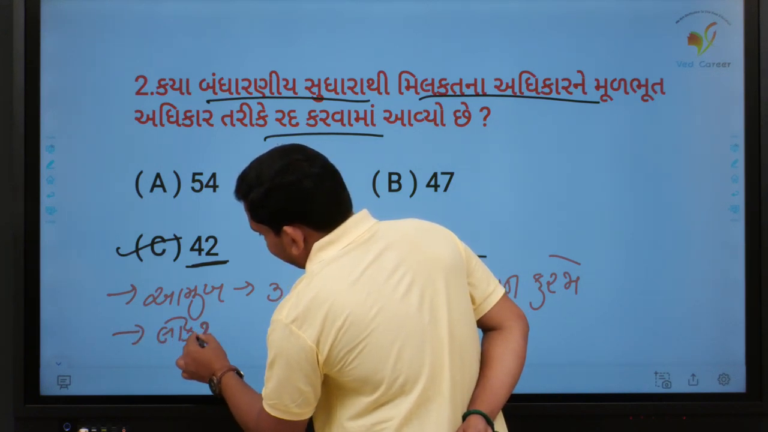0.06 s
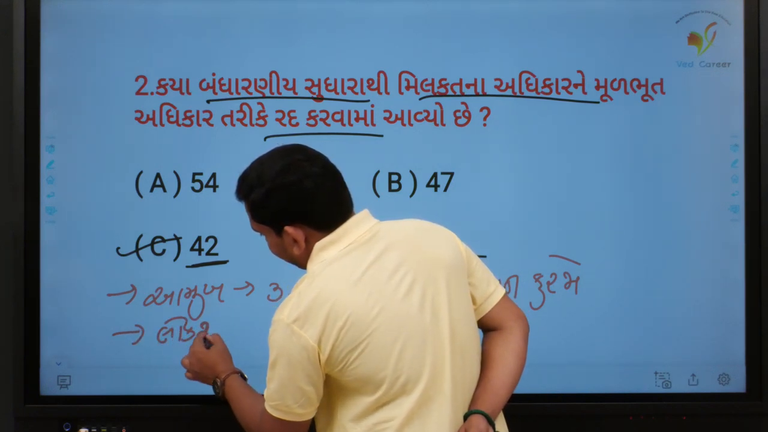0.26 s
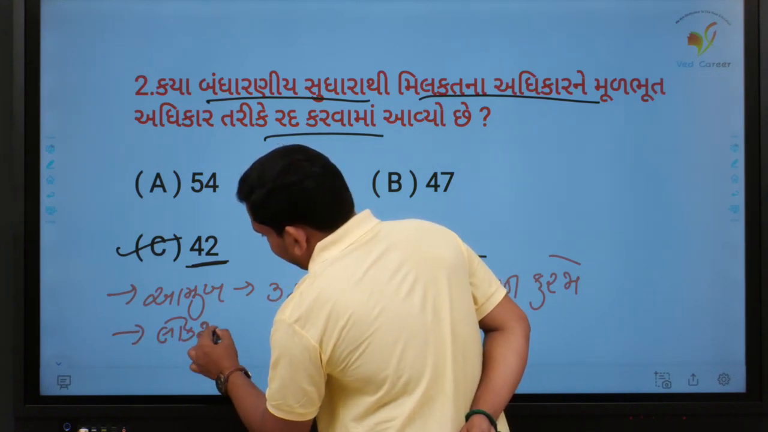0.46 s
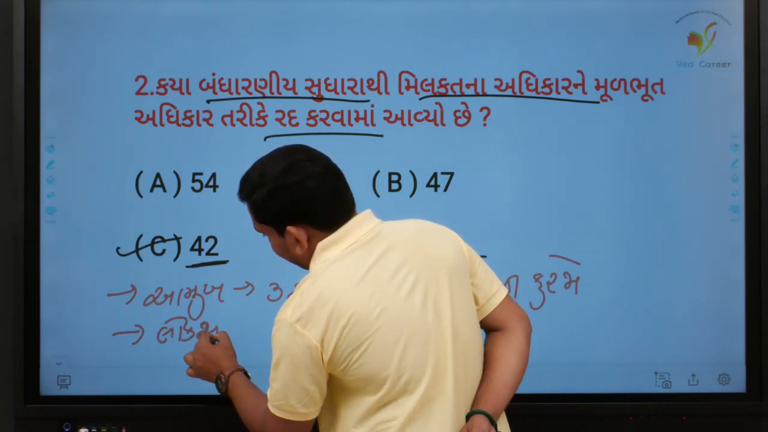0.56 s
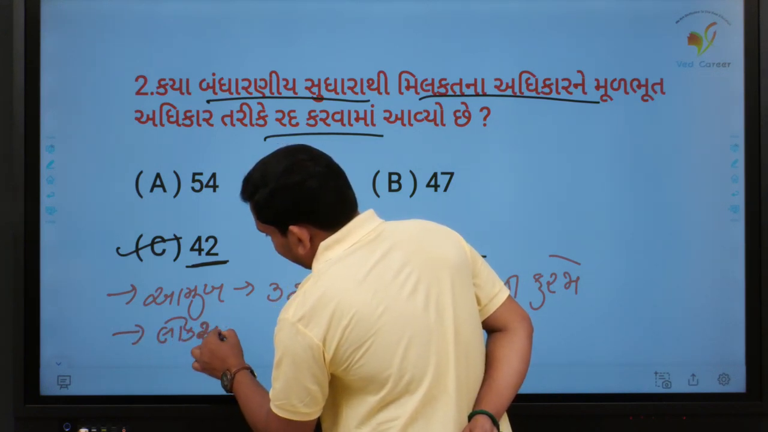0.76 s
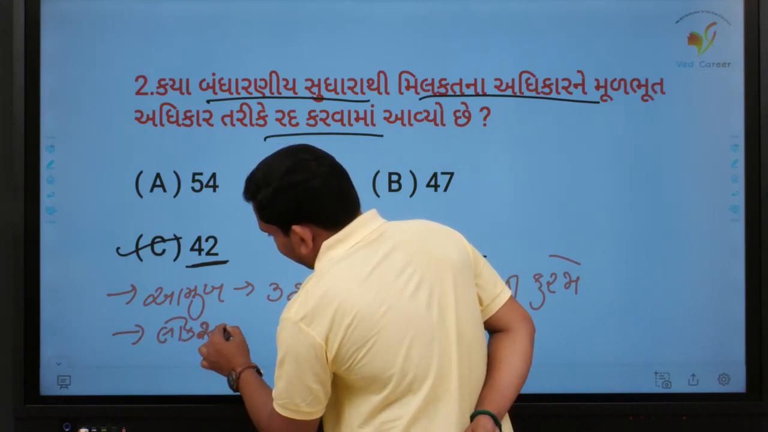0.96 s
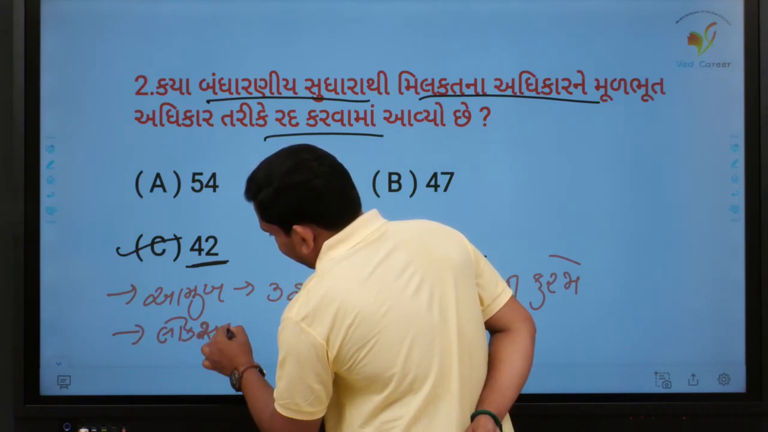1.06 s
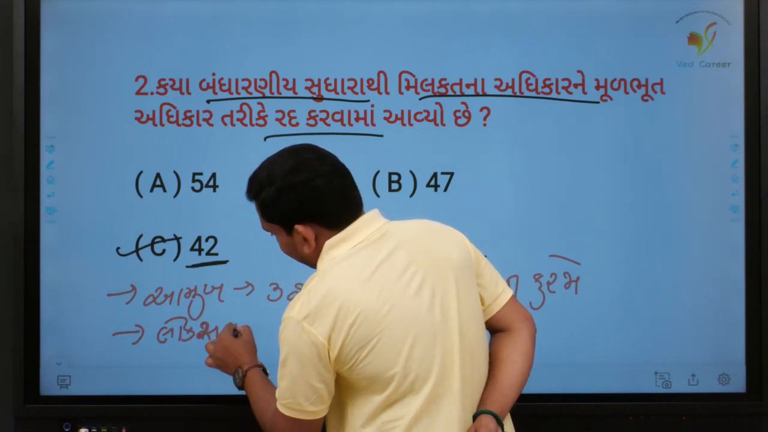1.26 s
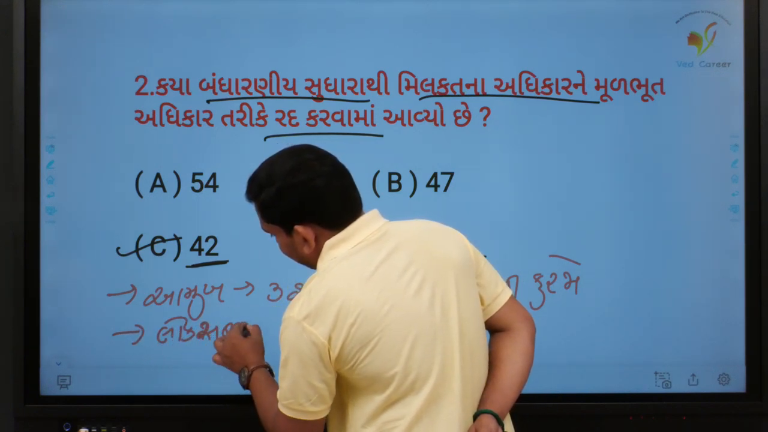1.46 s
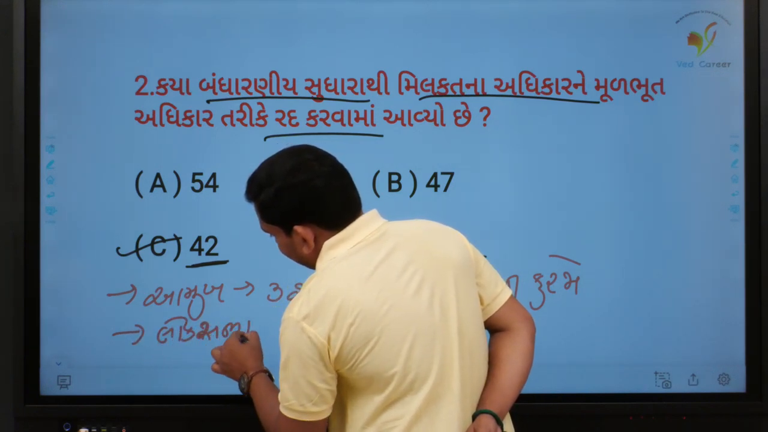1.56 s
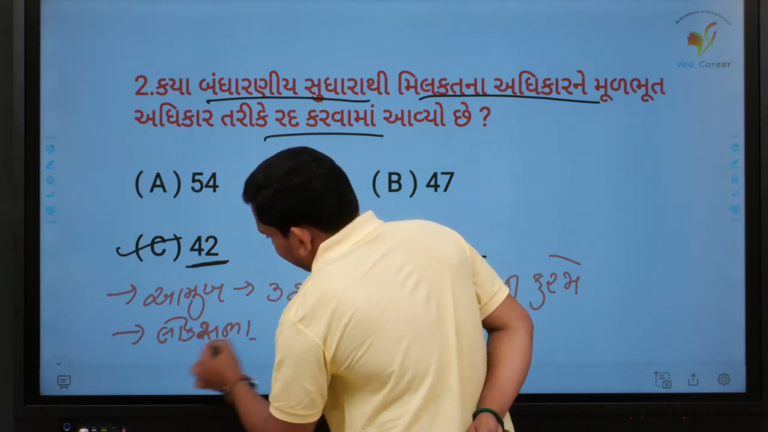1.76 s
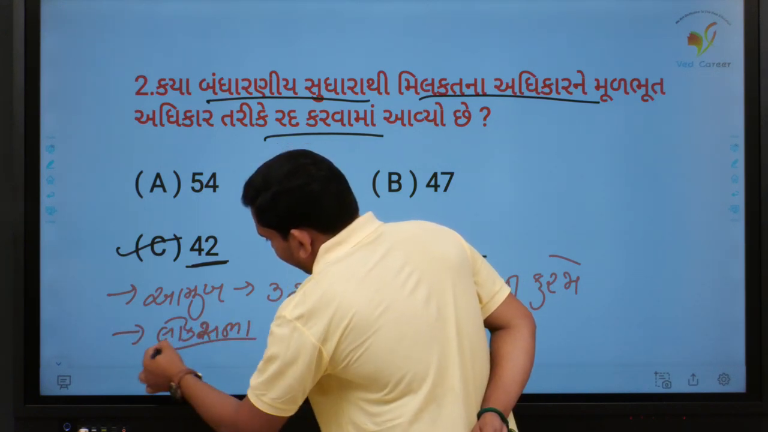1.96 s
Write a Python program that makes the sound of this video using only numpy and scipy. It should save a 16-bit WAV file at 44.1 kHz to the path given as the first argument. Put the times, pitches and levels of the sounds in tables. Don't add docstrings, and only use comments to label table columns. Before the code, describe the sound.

Stylus taps and light friction scratches on a glass panel, starting quietly, then medium, soft and firm knocks, the hardest rattling near the end, with slight room echo and swelling low ventilation hum.

```python
import sys
import numpy as np
from scipy import signal
from scipy.fft import rfft, irfft
from scipy.io import wavfile
from scipy.ndimage import uniform_filter1d, map_coordinates

SR = 44100
rng = np.random.default_rng(int(sys.argv[2]) if len(sys.argv) > 2 else 0)


def nominal_scale(level):
    x = np.asarray(level, float) / 20
    return 10 ** x


def inscribe(sig):
    pcm = np.round(np.clip(np.atleast_2d(sig).T, -1, 1) * 32767)
    wavfile.write(sys.argv[1], SR, pcm.astype(np.int16))


N = 88861

# mode_hz, level_db, t60_s
PANEL_MODES = [(122, -27.5, 0.72), (251.1, -26.5, 0.2), (480, -14, 0.12), (637, -73, 0.12),
               (810, -19, 0.043), (900, -7, 0.036), (891, -9, 0.088), (1152, -8, 0.02), (1393, -12.5, 0.09),
               (1562, -5.5, 0.12), (1862, -18.5, 0.021), (2250, 2.5, 0.0028)]
# freq_hz, level_db
PEN_RATTLE = [(900, 11), (1900, 8.5), (2900, 0), (4300, 3), (5400, -4), (6800, -18), (8800, -14),
              (16000, -28)]


def evened(x):
    return x / np.sqrt(np.mean(x ** 2) + 1e-20)


def read(points, hz):
    f, value = np.transpose(points)
    return np.interp(np.log(hz + 1), np.log(f + 1), value)


def colour(x, points):
    gain = nominal_scale(read(points, np.fft.rfftfreq(len(x), 1 / SR)))
    return irfft(rfft(x) * gain, len(x))


def lowpass(x, order, hz):
    return signal.sosfilt(signal.butter(order, hz, fs=SR, output="sos"), x)


def highpass(x, order, hz):
    return signal.sosfilt(signal.butter(order, hz, "high", fs=SR, output="sos"), x)


def add(mix, start_s, sound):
    at = round(start_s * SR)
    sound = sound[max(-at, 0):]
    part = mix[max(at, 0):][:len(sound)]
    part += sound[:len(part)]


def resonate(x, hz, width_hz):
    radius = np.exp(-np.pi * width_hz / SR)
    turn = np.exp(2j * np.pi * hz / SR)
    return 2 * signal.lfilter([1 - radius], [1, -radius * turn], x + 0j).real


def taps():
    # start_s, peak_db, contact_ms, knock_hz, rattle_db, tick_db
    landings = [
        (-.12, -15, 0.63, 672, -7.5, -18),
        (.3778, -16, 0.54, 682, -16, -37.5),
        (0.5043, -20, 0.56, 676, -21, -54),
        (.7570, -12.5, 0.47, 656, -13, -37),
        (0.9904, -20, 0.55, 671, -24, -67),
        (1.5033, -10, 0.52, 639, -5, -29),
        (1.7332, -11, 0.59, 655, -14.5, -57),
    ]
    # (overtone_hz, level_re_peak_db) x 3
    spot_overtones = [(870, -39, 1300, -26, 1200, -34), (940, -32, 1180, -24, 1700, -20),
                      (910, -25, 1070, -32, 950, -23), (905, -25.5, 1090, -23, 1778, -17),
                      (892, -18.5, 1100, -32, 1500, -20), (905, -26, 990, -19, 1900, -18.5),
                      (848, -18, 1250, -21.5, 2800, -41)]
    # start_s, knock_db, tick_db
    touches = [
        (.27, -66, -66),
        (.887, -66, -59),
        (1.232, -52, -80),
        (1.307, -46, -78),
        (1.612, -66, -68),
        (1.7297, -60, -62),
    ]
    touch_decay_s, touch_rise_s, touch_hz = 0.003, 0.00078, 647
    out, t = np.zeros(N), np.arange(SR) / SR
    for row, overtones in zip(landings, spot_overtones):
        add(out, row[0], tap(*row[1:], overtones, rng.standard_normal(SR)))
    for start_s, knock_db, tick_db in touches:
        tick = evened(colour(rng.standard_normal(SR), PEN_RATTLE)) * np.exp(-t / touch_decay_s)
        note = knock(t, touch_hz) * np.minimum(t / touch_rise_s, 1)
        add(out, start_s, nominal_scale(knock_db) * note + nominal_scale(tick_db) * tick)
    return out


def tap(peak_db, contact_ms, knock_hz, rattle_db, tick_db, overtones, noise):
    panel_db, blow_db, radiate_hz, knock_db = -7, 2.5, 430, -8.5
    overtone_t60_s, rattle_t60_s, tick_decay_s, tick_top_hz = 0.036, 0.045, 0.0008, 15000
    room_db, room_top_hz = -5, 2600
    overtone_room_db, rattle_room_db, knock_room_db = -7, -9, -10.5
    t = np.arange(len(noise)) / SR
    contact = np.clip(t * 1000 / contact_ms, 0, 1)
    blow = np.sin(np.pi * contact) ** 2.15
    push = highpass(blow, 2, radiate_hz)

    spot = rng.uniform(-1.2, 1, (len(PANEL_MODES), 2))
    glass = nominal_scale(panel_db) * signal.fftconvolve(ring(t, spot), blow[:200] / blow.sum())[:len(t)]
    body = -nominal_scale(peak_db) * (glass + nominal_scale(blow_db) * push)

    over = np.zeros(len(t))
    for hz, over_db in np.reshape(overtones, (-1, 2)):
        over -= nominal_scale(peak_db + over_db - 60 * t / overtone_t60_s) * np.sin(2 * np.pi * hz * t)
    note = nominal_scale(peak_db + knock_db) * knock(np.maximum(t - contact_ms / 1000, 0), knock_hz)

    pen = evened(colour(noise, PEN_RATTLE)) * nominal_scale(rattle_db - 15.5 - 60 * t / rattle_t60_s) * contact
    tick = lowpass(nominal_scale(tick_db) * noise * np.exp(-t / tick_decay_s), 4, tick_top_hz)

    to_room = lowpass(body, 2, room_top_hz) + nominal_scale(overtone_room_db) * over
    to_room = to_room + nominal_scale(rattle_room_db) * (pen + tick) + nominal_scale(knock_room_db) * note
    return body + over + pen + tick + note + nominal_scale(room_db) * edged(room(to_room))


def ring(t, spot):
    bass_db, longest_t60_s = 5.5, 0.032
    spread_db, spread_share = 2.5, 0.025
    out = np.zeros(len(t))
    for (hz, db, t60_s), (louder, sharper) in zip(PANEL_MODES, spot):
        if hz < 300:
            gain_db = bass_db
        else:
            gain_db = spread_db * louder
            t60_s = min(t60_s, longest_t60_s)
        sine = np.sin(2 * np.pi * hz * (1 + spread_share * sharper) * t)
        out += nominal_scale(db + gain_db - 60 * t / t60_s) * sine
    return out


def knock(t, hz):
    hold_s, t60_s = 0.0076, 0.0092
    return np.sin(2 * np.pi * hz * t) * nominal_scale(-60 * np.maximum(t - hold_s, 0) / t60_s)


def strokes():
    # start_s, length_s, level_db, reflection_ms, reflection_share, treble_db
    rubs = [(-.01, 0.14, -64.5, 0.55, 0.12, 12), (.125, 0.14, -69.5, 0.98, .2, 21),
            (0.39, 0.056, -63.5, .5, .15, 13), (0.521, 0.083, -62, 0.54, 0.14, 0),
            (0.782, .09, -60.5, 0.45, 0.19, 6), (1.019, 0.085, -65.5, .53, 0.34, 15),
            (1.108, 0.064, -61.5, .53, 0.21, 4), (1.191, .1, -61, 0.54, 0.36, 8),
            (1.3, 0.08, -60.5, 0.59, 0.27, 3), (1.504, 0.073, -53, 0.57, 0.17, -4),
            (1.756, 0.21, -51.5, 0.59, 0.49, 6)]
    # freq_hz, level_db
    tip_colour = [(1500, 15), (3000, 0.5), (4300, 9), (5800, 3), (7500, -5), (8700, 3.5), (11500, 2),
                  (15000, -2)]
    # centre_s, length_s, level_db, pitch_hz, width_hz
    chatter = [(0.085, 0.047, -53.5, 1150, 430), (.07, 0.091, -78.5, 4600, 580),
               (.2, 0.13, -74.5, 4700, 680), (0.18, 0.11, -75.5, 6200, 610), (.22, 0.063, -61.5, 1020, 610),
               (0.562, 0.053, -75, 11000, 1100), (0.818, 0.052, -73, 11000, 960),
               (1.08, .06, -74, 14800, 1200), (1.065, 0.053, -71, 13000, 800),
               (1.28, .07, -69, 14900, 1200), (1.284, 0.072, -70, 12700, 610),
               (1.244, 0.066, -69.5, 4110, 750), (1, 0.048, -67, 10600, 700),
               (1.325, 0.053, -67.5, 3340, 3700), (1.35, 0.073, -58, 1030, 490),
               (1.55, .05, -66, 14700, 900), (1.805, 0.073, -54, 14500, 1800),
               (1.805, 0.037, -61, 8550, 600), (1.89, 0.065, -57.5, 8650, 450),
               (1.88, 0.065, -57, 12600, 900), (1.926, 0.084, -63, 4050, 310),
               (1.925, 0.051, -45.5, 1090, 450)]
    grain_db, lurch_db = 1.9, 0.8
    treble_hz, treble_fade_db_per_s = 13000, -70.0
    body_hz, body_lag, easy_db = 7050, 0.5, -61.5
    tip_hz, tip_width_hz, tip_ring_db, rumble_db = 8470, 570, -15.5, -12
    level_db, rise_s, fall_s, arch_db = 6.5, 0.024, 0.018, 3.0
    echo_slide_ms_per_s = -0.4
    hand_ms, hand_slide_ms_per_s, hand_share = 0.345, -0.55, 0.4
    t, out = np.arange(N) / SR, np.zeros(N)

    grit = rng.standard_normal(N) * nominal_scale(grain_db * evened(uniform_filter1d(rng.standard_normal(N), 120)))
    grit = grit * nominal_scale(lurch_db * evened(uniform_filter1d(rng.standard_normal(N), 700)))
    hiss = evened(colour(grit, tip_colour))
    treble = signal.sosfiltfilt(signal.butter(2, treble_hz, "high", fs=SR, output="sos"), hiss)
    body = signal.sosfiltfilt(signal.butter(2, body_hz, fs=SR, output="sos"), hiss)
    squeak = nominal_scale(tip_ring_db) * evened(resonate(grit, tip_hz, tip_width_hz))
    panel = ring(t[:2000], np.zeros((len(PANEL_MODES), 2)))
    rumble = evened(signal.fftconvolve(np.diff(grit, prepend=0), panel)[:N])

    for start_s, length_s, db, echo_ms, share, treble_db in rubs:
        u = (t - start_s) / length_s
        rise = np.clip(u * length_s / rise_s, 0, 1)
        fall = np.clip((1 - u) * length_s / fall_s + 0.5, 0, 1)
        arch = np.sin(np.pi * np.clip(u, 0, 1)) - 2.0
        shape = rise * fall * nominal_scale(level_db + db + arch_db * arch)
        age_s = np.clip(t - start_s, 0, length_s)
        rub = hiss + treble * (nominal_scale(treble_db + treble_fade_db_per_s * age_s) - 1)
        rub = rub + body * (nominal_scale(-body_lag * (db - easy_db)) - 1)
        rub = rub - share * late(rub, echo_ms + echo_slide_ms_per_s * age_s)
        off_hand = late(rub + squeak, hand_ms + hand_slide_ms_per_s * age_s)
        rub = rub + share * (squeak + hand_share * off_hand)
        out += shape * (rub + nominal_scale(rumble_db) * rumble)

    for centre_s, length_s, db, hz, width_hz in chatter:
        buzz = evened(resonate(resonate(grit, hz, width_hz), hz, width_hz))
        out += nominal_scale(db) * np.exp(-(2 * (t - centre_s) / length_s) ** 2) * buzz
    return out


def late(x, ms):
    return map_coordinates(x, [np.arange(len(x)) - ms * SR / 1000], order=5)


def room(x):
    # freq_hz, t60_s
    decay = [(120, 0.91), (400, 0.59), (800, 0.56), (1600, 0.39), (3200, 0.46), (6400, 0.35), (14000, 0.11)]
    start_s = 0.0022
    tail = np.zeros(SR)
    at = np.arange(0, SR - 20, 20) + rng.integers(0, 20, (SR - 1) // 20)
    tail[at] = rng.choice([-1., 1.], len(at))
    hz, t, z = signal.stft(tail, SR, nperseg=256)
    fade = nominal_scale(-60 * t / read(decay, hz)[:, None])
    tail = signal.istft(z * fade, SR, nperseg=256)[1][:SR]
    tail = tail * np.clip(np.arange(SR) / SR / start_s - 1, 0, 1)
    return signal.fftconvolve(x, tail / np.linalg.norm(tail))[:len(x)]


def air():
    # freq_hz, level_db
    air_colour = [(25, -20), (145, 1), (300, -11.5), (430, -24.5), (700, -17), (2000, -34.5), (7000, -48.5),
                  (16000, -49)]
    # pitch_hz, width_hz, level_db, fan_swell_share
    ducts = [(36.4, 10, -48, 0.21), (67.5, 14, -78, 0.23), (112.2, 4.7, -57, 1.7),
             (144.85, 12.3, -52, 0.31), (170.57, 3.7, -51, 2.6), (249, 84, -70, 0.93)]
    # time_s, level_db
    fan = [(0.0, -24), (.4, -27), (.85, -3.5), (1.0, 1), (1.2, 2.5), (1.35, -2), (1.6, -2), (2.01, 0)]
    air_db, air_swell_share = -50.5, 0.18
    time_s, effort_db = np.transpose(fan)
    fan_db = np.interp(np.arange(N) / SR, time_s, effort_db)
    broad = evened(colour(rng.standard_normal(N + 1), air_colour)[:N])
    out = nominal_scale(air_db + air_swell_share * (fan_db + 10)) * broad
    for hz, width_hz, db, share in ducts:
        noise = rng.standard_normal(N + SR)
        tone = resonate(resonate(noise, hz, width_hz), hz, width_hz)[SR:]
        out = out + nominal_scale(db + share * fan_db) * evened(tone)
    return out


def edged(x):
    return signal.oaconvolve(x, signal.firwin(301, 15800, window=("kaiser", 8), fs=SR), "same")


def scene():
    stroke_room_db = -9.0
    slides = strokes()
    steady = slides + nominal_scale(stroke_room_db) * room(slides) + air()
    return (taps() + edged(steady))[None]


def low_pass(x):
    return signal.sosfilt(signal.butter(12, 16680, fs=SR, output="sos"), x)


def record(dry):
    cut = highpass(dry, 2, 28)
    cut = signal.sosfiltfilt(signal.butter(8, 16300, fs=SR, output="sos"), cut)
    return low_pass(cut)


dry = scene()
out = record(dry)
inscribe(out)
```